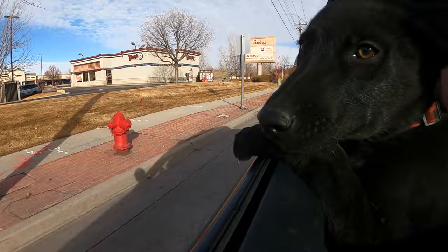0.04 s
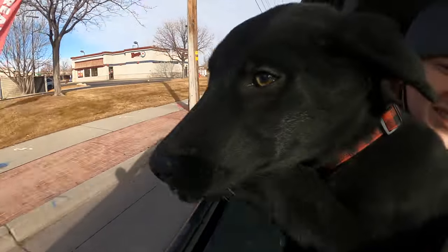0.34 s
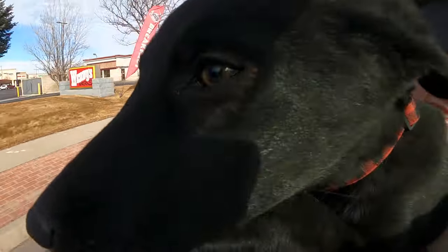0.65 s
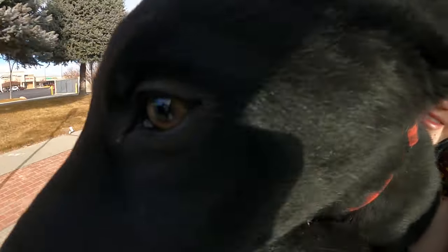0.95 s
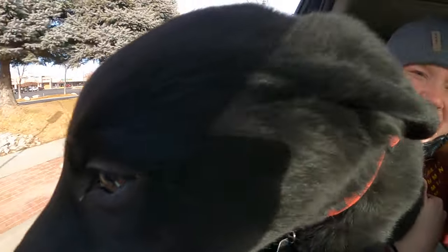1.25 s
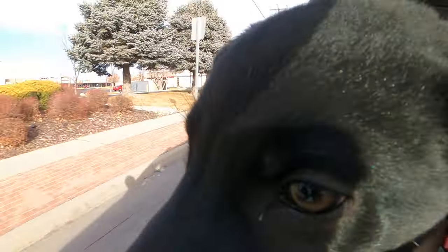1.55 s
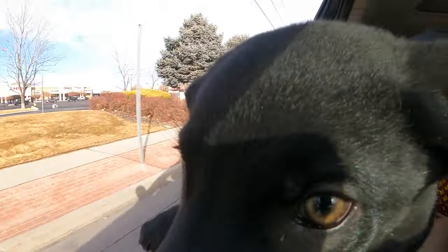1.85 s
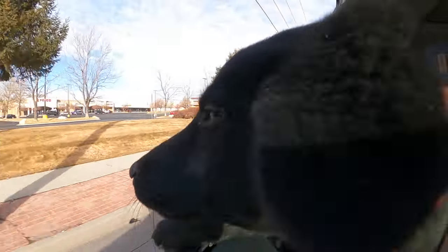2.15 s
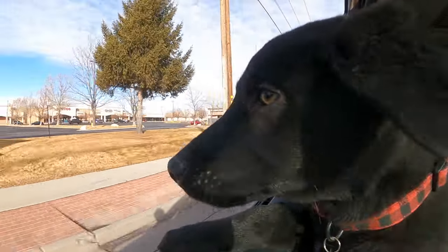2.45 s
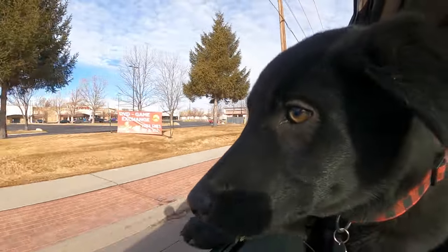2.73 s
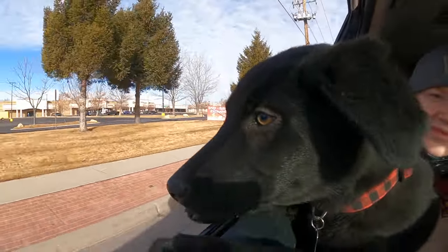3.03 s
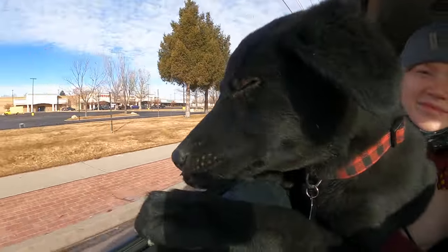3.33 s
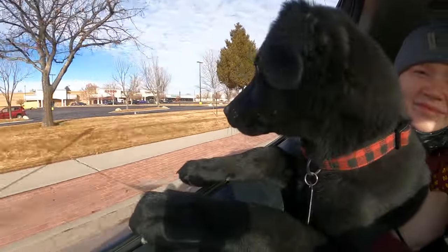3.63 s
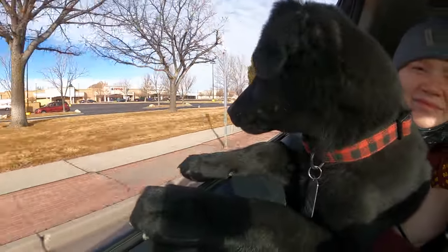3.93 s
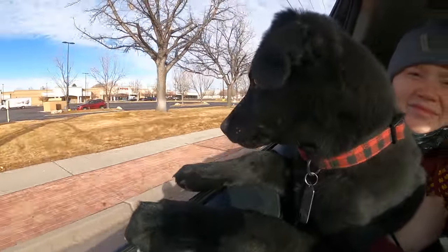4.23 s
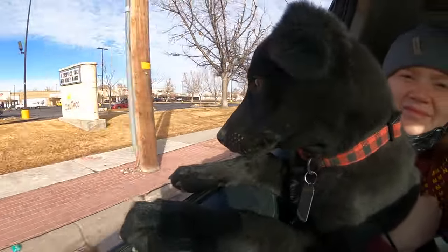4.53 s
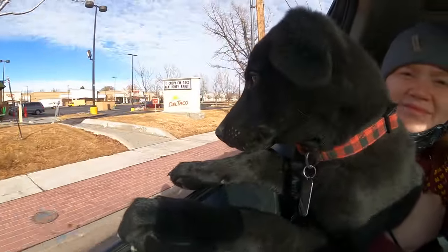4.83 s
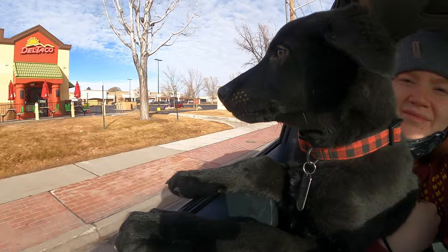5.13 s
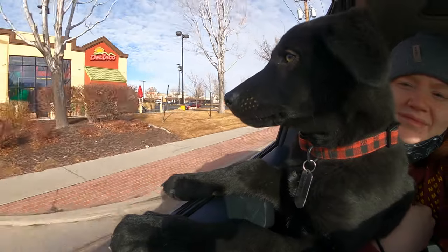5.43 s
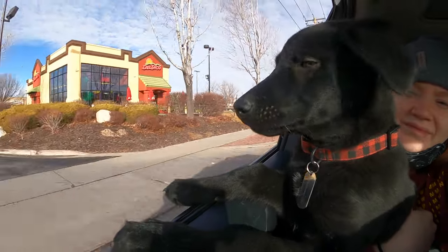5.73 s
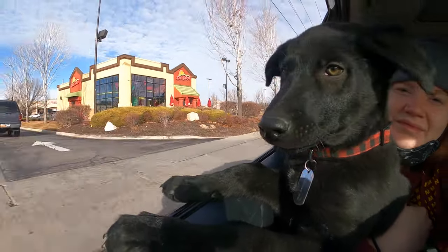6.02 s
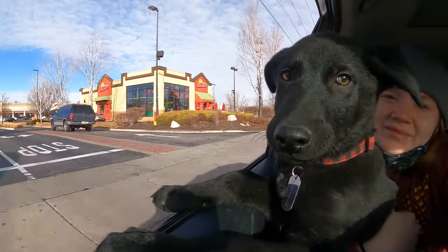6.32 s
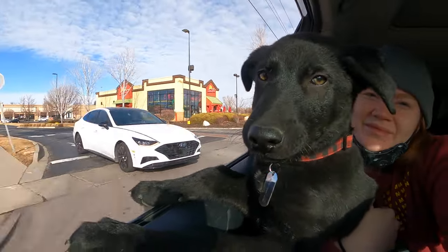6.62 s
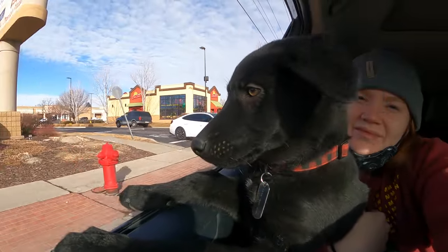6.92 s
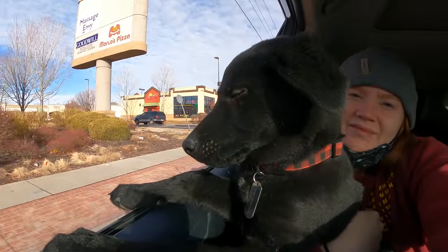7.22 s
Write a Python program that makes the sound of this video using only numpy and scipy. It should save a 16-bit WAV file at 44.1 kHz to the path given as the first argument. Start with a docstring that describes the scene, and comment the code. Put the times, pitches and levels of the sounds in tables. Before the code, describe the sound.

A car drives along a street with a side window open. Close up, wind thumps and rumbles on the microphone throughout and hisses past the window frame. A few soft bumps and faint ticks of a dog's collar against the door come near the start. The tyre roar then grows, with a faint wavering whine over the drone of the cabin, and a few very faint, thin squeaks slip through.

```python
"""In a car driving along a street, microphone at an open side window, a dog leaning out beside it. Close up,
wind buffets the microphone and hisses and hoots round the frame; a fast limiter holds the bass down. From the
road below, the tyres roar and sing near 1 kHz over a faint whine; the cabin drones. A few soft bumps, a click
of the door, ticks of the collar on the door and thin squeaks come through nearby. The sound is mono at first
and spreads a little towards the end."""
import sys
import numpy as np
from scipy import signal
from scipy.fft import rfft, irfft, next_fast_len
from scipy.io import wavfile
from scipy.ndimage import uniform_filter1d, minimum_filter1d

SR = 44100
rng = np.random.default_rng(int(sys.argv[2]) if len(sys.argv) > 2 else 0)


def output_pcm(signal):
    """Save a mono or channel-first signal as 16-bit PCM at the path in sys.argv[1].

    Samples are clipped to [-1, 1] before scaling.
    """
    pcm = np.clip(np.atleast_2d(signal).T, -1, 1) * 32767
    wavfile.write(sys.argv[1], SR, np.round(pcm).astype(np.int16))


N = 329427
T = np.arange(N) / SR
HZ = np.fft.rfftfreq(N, 1 / SR)


def gain_of(db):
    """Decibels to amplitude."""
    return 10 ** (np.asarray(db) / 20)


def unit_rms(x):
    """Scales to rms 1."""
    return x / np.sqrt(np.mean(x ** 2) + 1e-20)


def db_at(spectrum, hz):
    """Reads a spectrum table on a log-frequency axis."""
    f, db = np.transpose(spectrum)
    return np.interp(np.log(hz + 1), np.log(f + 1), db)


def curves(rows):
    """Each column of a time table, sample by sample."""
    times, *columns = np.transpose(rows)
    return [np.interp(T, times, column) for column in columns]


def bell(middle_s, length_s):
    """A smooth rise and fall."""
    return np.exp(-(2 * (T - middle_s) / length_s) ** 2)


def wander(rate_hz):
    """Random drift of rms 1, up to about the given rate."""
    size = next_fast_len(N)
    smooth = np.exp(-(np.fft.rfftfreq(size, 1 / SR) / rate_hz) ** 2)
    return unit_rms(irfft(rfft(rng.standard_normal(size)) * smooth, size)[:N])


# Spread at the microphone, at full width: (frequency [Hz], side minus mid [dB])
SPREAD = [(60, -28.5), (110, -32.5), (210, -30.5), (390, -27.5), (740, -18.5), (1390, -16), (2600, -10),
          (8000, -2)]
def airflow(spectrum, patchy_db):
    """Stereo turbulence of rms 1: shaped noise with drifting patches, nearly mono in the bass."""
    hz = np.fft.rfftfreq(2048, 1 / SR)
    mid_re, mid_im, side_re, side_im, patches = rng.standard_normal((5, N // 512 + 5, len(hz)))
    patches = uniform_filter1d(patches, size=12, axis=0)  # over time
    patches = unit_rms(uniform_filter1d(patches, size=24, axis=1))  # over frequency
    mid = mid_re + 1j * mid_im
    side = (side_re + 1j * side_im) * gain_of(db_at(SPREAD, hz))
    frames = np.array([mid + side, mid - side]) * gain_of(db_at(spectrum, hz) + patchy_db * patches)
    _, noise = signal.istft(frames.transpose(0, 2, 1), nperseg=2048, noverlap=1536)
    return unit_rms(noise[:, :N])


def singing(hz, width_hz):
    """A fuzzy stereo tone: noise in a narrow resonance that follows the curve hz."""
    phase = 2 * np.pi * np.cumsum(hz) / SR
    mid, side = (unit_rms(wander(width_hz) * np.cos(phase) + wander(width_hz) * np.sin(phase))
                 for _ in range(2))
    return mid + np.outer([1, -1], side * gain_of(db_at(SPREAD, hz.mean())))


def sine(hz):
    """A pure tone that follows the curve hz."""
    return np.sin(2 * np.pi * np.cumsum(hz) / SR)


# Faint squeaks beside the microphone, one curve each: (time [s], pitch [Hz], level [dB])
SQUEAKS = [
    [(2.645, 6300, -72), (2.685, 6680, -62), (2.707, 7080, -50), (2.76, 7430, -59), (2.778, 7490, -67),
     (2.815, 7790, -60), (2.835, 7850, -68), (2.853, 8250, -67), (2.88, 8650, -80)],
    [(3.39, 6580, -81), (3.43, 6650, -67), (3.54, 7050, -82)],
    [(3.543, 7300, -82), (3.557, 7560, -66), (3.593, 8250, -85)],
    [(4.586, 4410, -68), (4.592, 4720, -56), (4.602, 5160, -66), (4.612, 4910, -54), (4.632, 4600, -66)],
]
def squeaks():
    """Thin, unsteady whistles, mostly rising: perhaps the dog whimpering through its nose."""
    out = np.zeros(N)
    for points in SQUEAKS:
        hz, db = curves(points)
        tone = sine(hz * (1 + .005 * wander(200)))
        sounding = (T > points[0][0]) & (T < points[-1][0])
        out += sounding * gain_of(db + 2.3 * wander(120)) * tone
    return out


# The collar's scuff on the door: (frequency [Hz], relative level [dB])
SCUFF = [(100, -25), (700, -4), (1500, 0), (3300, 0), (4500, -4), (6800, -5), (8000, -18), (10500, -20),
         (13000, -38), (16000, -55)]
# Modes of its metal: (frequency [Hz], relative level [dB], time to fall 60 dB [s])
COLLAR_MODES = [(2730, -10, 0.1), (2950, -14, 0.076), (3530, -8.5, 0.055), (4160, -13, 0.054),
                (4760, -18, 0.052), (5400, -17.5, 0.045), (6350, -23, .04)]
# Touches close to the microphone, the first a click of the door, the rest the collar: (time [s], level [dB],
# scuff tilt [dB/octave], scuff decay [s], relative ring [dB], favoured frequency [Hz], relative bounce [dB])
TICKS = [(0.3096, -26.5, -9.5, 0.003, -16, 3300, -11), (1.1516, -33.5, -4, 0.005, -3.5, 5400, -5),
         (1.204, -38, -7.5, .005, -5, 6500, -4), (1.241, -39.5, -6, .004, -7, 4800, -13),
         (1.7065, -38, -4, .008, -1, 4800, -10)]
def collar_ticks(rise_s=0.0015, bounce_s=0.01):
    """Touches at the door, each bouncing once: a short scuff, then a damped ring of the collar's metal. The
    first is a click of the door itself, with only a faint ring."""
    out = np.zeros(N)
    t = np.arange(-1024, 7168) / SR
    hz, after = np.fft.rfftfreq(len(t), 1 / SR), np.maximum(t, 0)
    for s, db, tilt, decay_s, ring_db, favoured_hz, bounce_db in TICKS:
        envelope = np.exp(-np.maximum(-t / rise_s, t / decay_s))
        colour = gain_of(db_at(SCUFF, hz) + tilt * np.log2((hz + 100) / 4000))
        ring = 0
        for f, mode_db, t60 in COLLAR_MODES:
            favour_db = 8 * np.exp(-((f - favoured_hz) / 300) ** 2)  # the struck spot favours one mode
            ring += gain_of(mode_db + favour_db - 60 * after / t60) * np.sin(2 * np.pi * f * after)
        for at, touch_db in (s, db), (s + bounce_s, db + bounce_db):
            scuff = unit_rms(irfft(rfft(rng.standard_normal(len(t))) * colour)) * envelope
            touch = scuff + gain_of(ring_db) * ring * np.tanh(after / rise_s)
            out += np.pad(gain_of(touch_db) * touch, (round((at + t[0]) * SR), N))[:N]
    return out


# Soft bumps near the microphone: (time [s], relative level [dB], pitch [Hz])
BUMPS = [(0.148, -26, 238), (0.198, -4.5, 220), (.2, -22, 400), (0.2537, -13, 293), (.255, -23, 620),
         (.3065, -7.5, 190), (.307, -21.5, 685), (0.3085, -24, 1070)]
def bumps(decay_s=0.0035):
    """Dull knocks, each a quickly damped tone."""
    out = np.zeros(N)
    for s, db, hz in BUMPS:
        t = np.maximum(T - s, 0)
        envelope = t / decay_s * np.exp(1 - 2 * t / decay_s)
        out += gain_of(db) * envelope * np.sin(2 * np.pi * hz * t)
    return out


# Brief notes of the tyres and window frame: (middle [s], length [s], level [dB], pitch [Hz])
WHISTLES = [(0.94, 0.074, -41, 1046), (1.654, .05, -43, 1790), (1.773, 0.039, -35.5, 1550),
            (1.81, 0.11, -40, 946), (2.493, 0.1, -34, 1042), (2.664, 0.13, -31.5, 1039),
            (3.538, 0.24, -37, 1035), (4.31, 0.1, -35, 958), (4.45, 0.22, -41, 1058),
            (4.57, 0.13, -36, 962), (4.724, 0.031, -30, 1026), (7.076, 0.17, -37, 1019)]
def whine(start_hz=1064, sag_hz_per_s=5.5, level_db=-50.5):
    """A faint, breathy tone sinks slowly in pitch; clearer whistles swell and fade around it."""
    hz = start_hz - sag_hz_per_s * T + 4 * wander(11.7)
    out = gain_of(level_db + 4 * wander(5)) * (sine(hz) + 0.47 * singing(hz, width_hz=28))
    waver_hz = 3 * wander(12.3)
    for s, length, db, note_hz in WHISTLES:
        out += gain_of(db) * bell(s, length) * sine(note_hz + waver_hz)
    return out


# The window opening, right by the microphone: (time [s], centre [Hz], level [dB])
HOOT = [(0, 1500, -63), (1.3, 1560, -56), (1.54, 1590, -42.5), (1.65, 1690, -42.5), (1.77, 1600, -44),
        (2.1, 1620, -45.5), (2.5, 1680, -45), (2.8, 1700, -46), (3.3, 1680, -55.5), (4.5, 1660, -51),
        (6, 1630, -54), (7.47, 1660, -49)]
def window_hoot():
    """A hollow, half-whistling resonance of the opening that drifts and flutters in the wind."""
    hz, db = curves(HOOT)
    return singing(hz + 30 * wander(10), width_hz=135) * gain_of(db + 1.3 * wander(12))


# Fine fizz at the window's edge: (frequency [Hz], relative level [dB]) and (time [s], level [dB])
FIZZ = [(1000, -20), (3100, -5.5), (3850, 5.5), (4700, 0), (6800, 4), (7900, -5), (8800, -7), (9400, -12),
        (10300, -11), (11800, -16.5), (13300, -13.5), (15500, -28)]
FIZZ_LEVEL = [(0, -79), (.85, -70), (1.4, -73), (2, -68.5), (3.05, -63), (3.35, -67.5), (4.2, -62.5),
              (4.9, -68), (5.25, -62.5), (5.5, -71), (5.75, -62.5), (6.3, -69.5), (6.85, -62), (7.47, -60)]
# Air passing the frame, close up: (frequency [Hz], relative level [dB]) and (time [s], level [dB])
RUSH = [(300, -1), (1000, 0), (1500, 3), (2200, -4.5), (3000, -7), (4000, -12.5), (5500, -18.5),
        (6850, -22.5), (7400, -32.5), (9300, -38.5), (10300, -38), (11800, -49.5), (13500, -53),
        (15500, -62)]
RUSH_LEVEL = [(0, -49), (.3, -48.5), (.7, -46.5), (.87, -43), (1.05, -45), (1.4, -44), (2.1, -42),
              (3.08, -43.5), (3.38, -45.5), (3.7, -44), (4.25, -43.5), (4.85, -47), (5.25, -44.5),
              (5.75, -44.5), (6.35, -47), (6.75, -44.5), (7.47, -46)]
def window_hiss(flutter):
    """Air rushes past the frame and fizzes at its edge."""
    rush = airflow(RUSH, patchy_db=0.5) * gain_of(curves(RUSH_LEVEL)[0] + 0.64 * flutter)
    fizz = airflow(FIZZ, patchy_db=-0.5) * gain_of(curves(FIZZ_LEVEL)[0] + 1.2 * flutter)
    return rush + fizz


# The tread's main band, down at the road: (time [s], centre [Hz], level [dB])
TREAD = [(0, 980, -59.5), (1.3, 976, -59), (1.8, 945, -43), (2.4, 968, -44), (3, 965, -40.5),
         (3.4, 935, -44.5), (3.7, 920, -37.5), (4.15, 922, -39), (4.6, 958, -39.5), (5, 958, -39.5),
         (5.5, 930, -41.5), (6.4, 922, -42), (6.95, 950, -39.5), (7.47, 920, -49)]
def tyre_tread():
    """The tread sings: a wavering tone inside a fuzzy band, with a weaker band below."""
    hz, db = curves(TREAD)
    tone = gain_of(-4.5) * unit_rms(sine(hz + 12.93 * wander(22.05)))
    band = singing(hz + 14 * wander(9.02), width_hz=66)
    low_band = gain_of(-7.5) * singing(hz * .88, width_hz=62)
    return (tone + band + low_band) * gain_of(db + wander(24))


# Tyres from the window: (frequency [Hz], relative level [dB]) and (time [s], relative level [dB])
ROAR = [(100, -47.5), (600, -8.5), (850, 3), (1030, 4), (1180, -1.5), (1400, -2.5), (1620, -2.5),
        (1790, -1.5), (2050, -12.5), (2800, -19.5), (5000, -59.5), (12000, -87)]
ROAR_LEVEL = [(0, -51.5), (.35, -49), (.8, -44.5), (1.1, -48), (1.35, -45), (1.75, -41), (2.8, -39.5),
              (3.4, -42.5), (3.85, -40.5), (5.3, -40), (6.2, -40.5), (7.47, -40)]
def tyre_roar(flutter):
    """Tyres roll on the street: broad noise near 1 kHz that grows as the car moves on."""
    return airflow(ROAR, patchy_db=1.6) * gain_of(curves(ROAR_LEVEL)[0] + 2.5 + 0.29 * flutter)


# Gusts and a lull at the window: (middle [s], length [s], change in the cabin [dB])
GUSTS = [(0.533, 0.16, 5.5), (0.87, 0.2, 4), (6.362, 0.071, -6.5)]
def gusts_db():
    """How far the gusts raise or lower the level at each moment."""
    return sum(db * bell(s, length) for s, length, db in GUSTS)


# The cabin behind the microphone, boom and drone: (frequency [Hz], relative level [dB])
BOOM = [(120, -28.5), (230, -1.5), (290, 0), (340, -2.5), (385, 2), (430, -7.5), (520, -19), (1000, -39.5),
        (5000, -100)]
DRONE = [(150, -32), (350, 0.5), (480, 3.5), (570, 5), (660, 1.5), (800, 1.5), (1000, -5.5), (1250, -9.5),
         (2500, -31.5), (9000, -89.5)]
def cabin(flutter, usual_db=-42.5):
    """The cabin drones with the mean level of roar and rush; its hollow boom follows them less."""
    drive_db = (curves(RUSH_LEVEL)[0] + curves(ROAR_LEVEL)[0]) / 2 - usual_db
    boom_db = -35.5 + 0.54 * drive_db + gusts_db()
    drone_db = -37.5 + 1.25 * drive_db + gusts_db() + 0.69 * flutter
    boom = airflow(BOOM, patchy_db=2) * gain_of(boom_db)
    drone = airflow(DRONE, patchy_db=1) * gain_of(drone_db)
    return boom + drone


# Low rumble at the window: (frequency [Hz], relative level [dB]) and (time [s], relative level [dB])
RUMBLE = [(40, -6.5), (100, -0.5), (160, 6.5), (210, 1), (270, -4.5), (340, -11), (700, -30.5), (1200, -39),
          (8000, -100)]
RUMBLE_LEVEL = [(0, -31), (.22, -28), (.48, -32.5), (.72, -25.5), (1.3, -34), (1.7, -33), (2.15, -32.5),
                (2.4, -29), (3.4, -28), (3.9, -24.5), (4.3, -26), (4.55, -31.5), (4.8, -24.5), (5.4, -27.5),
                (5.75, -26), (6.4, -28.5), (7.05, -26.5), (7.47, -27)]
# Wind right on the microphone: (frequency [Hz], relative level [dB]) and (time [s], level [dB])
BUFFET = [(5, -30), (14, -4.5), (28, -.5), (38, 1.5), (50, -0.5), (60, -3.5), (72, -3.5), (84, -2),
          (118, -9.5), (150, -22), (250, -30.5), (500, -51), (3000, -130)]
BUFFET_LEVEL = [(0, -14.5), (.9, -13), (1.4, -19.5), (2, -16.5), (2.4, -17), (2.9, -13.5), (3.5, -15.5),
                (4.4, -15.5), (5.1, -12), (6, -18), (6.4, -18.5), (6.7, -15.5), (7.47, -14)]
def wind():
    """Eddies at the window thump the microphone and stir a low rumble; the cabin air throbs unevenly."""
    buffet_db, = curves(BUFFET_LEVEL)
    buffet = airflow(BUFFET, patchy_db=1) * gain_of(buffet_db)
    eddies_db = .7 * wander(16)
    rumble_db = curves(RUMBLE_LEVEL)[0] + 0.5 + 0.22 * gusts_db()
    rumble = airflow(RUMBLE, patchy_db=1) * gain_of(rumble_db + eddies_db)
    throb_hz = 54 + 11 * wander(11)  # vortices shed across the opening at a restless rate
    throb = sine(throb_hz) * gain_of(buffet_db - 3.5 + 2 * wander(3.6))
    return buffet + rumble + throb


# Balance at the microphone, at full width: (frequency [Hz], left minus right [dB])
LEAN = [(130, 0.5), (270, 0), (580, 1.5), (1220, 4.5), (2600, 2)]
def scene():
    """Everything heard at the window, leaning slightly to the left."""
    mix = wind()
    flutter = wander(18)  # quick gusting shared by cabin, roar and hiss
    mix += cabin(flutter) + tyre_roar(flutter) + window_hiss(flutter)
    mix += tyre_tread() + window_hoot() + whine() + squeaks() + collar_ticks() + bumps()
    lean_db = np.outer([.5, -.5], db_at(LEAN, HZ))
    return irfft(rfft(mix) * gain_of(lean_db), N)


def limiter(x, ceiling_db, recovery_db_per_s):
    """Ducks just ahead of each peak and recovers steadily."""
    over_db = np.maximum(20 * np.log10(abs(x).max(0) + 1e-9) - ceiling_db, 0)
    recovery_db = T * recovery_db_per_s
    duck_db = np.maximum.accumulate(over_db + recovery_db) - recovery_db
    held_db = minimum_filter1d(-duck_db, size=200)
    return x * gain_of(uniform_filter1d(held_db, size=200))


def record(dry):
    """The image opens from mono late on, a fast bass limiter tames the wind, the top treble is cut."""
    mid = dry.mean(0)
    width = np.clip((T - 5.62) / 1.37, 0, 1)
    image = mid + (dry - mid) * width
    bass = irfft(rfft(image) / (1 + (HZ / 230) ** 4), N)
    out = image - bass + limiter(bass, ceiling_db=-11, recovery_db_per_s=202)
    lowpass = signal.firwin(511, 15700, window=("kaiser", 9), fs=SR)
    return signal.oaconvolve(out, lowpass[None], "same")


dry = scene()
out = record(dry)
output_pcm(out)
```